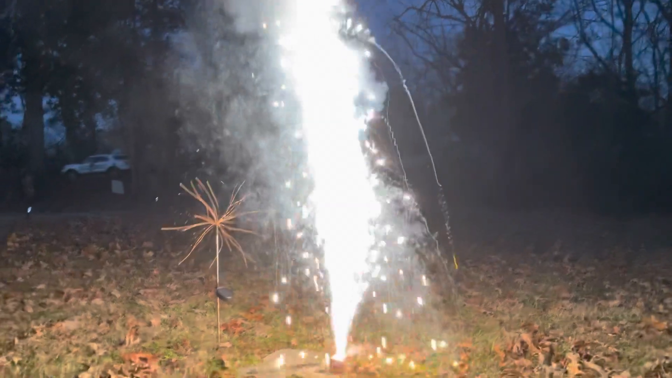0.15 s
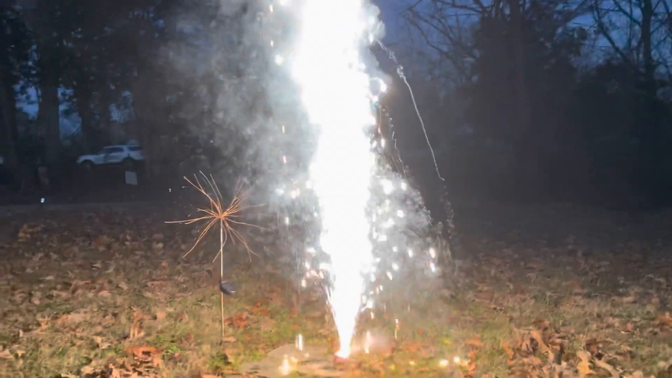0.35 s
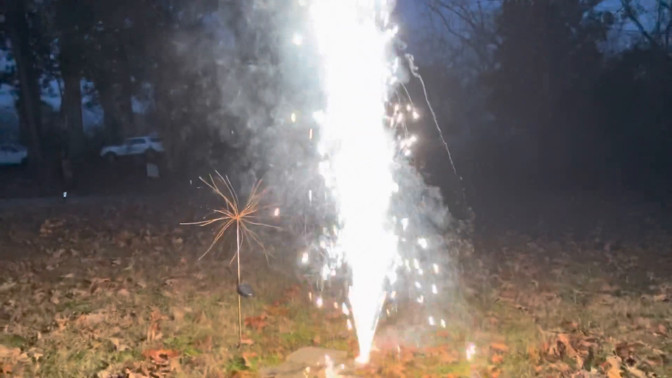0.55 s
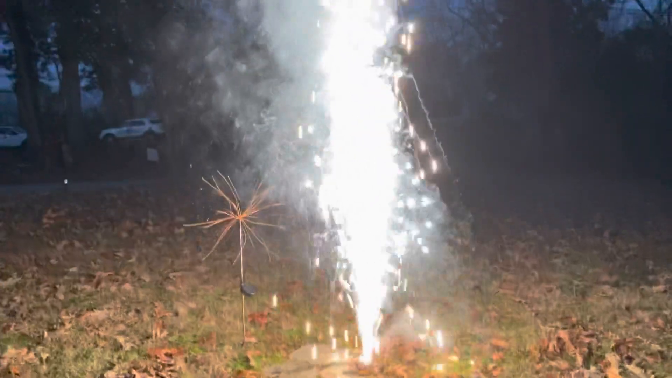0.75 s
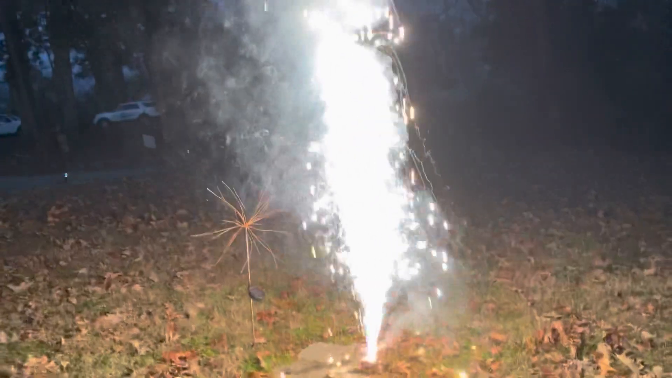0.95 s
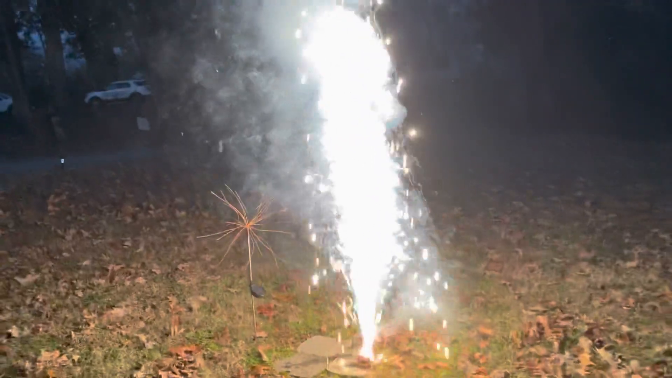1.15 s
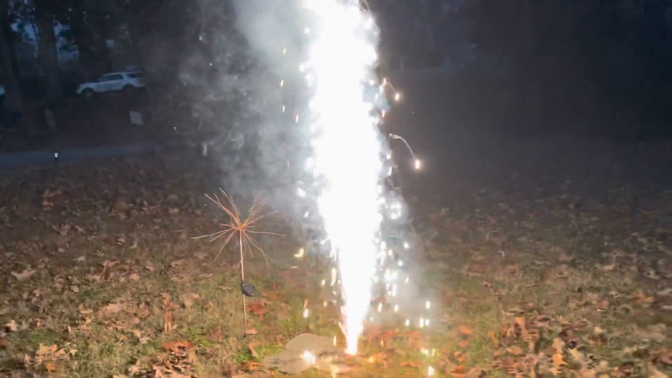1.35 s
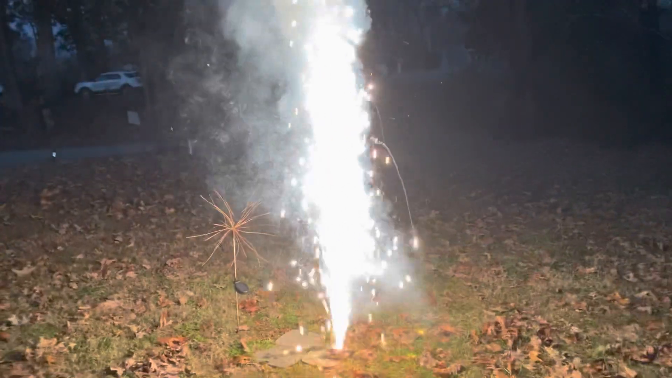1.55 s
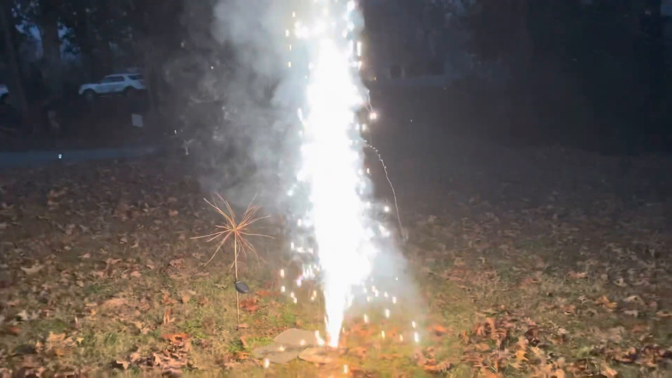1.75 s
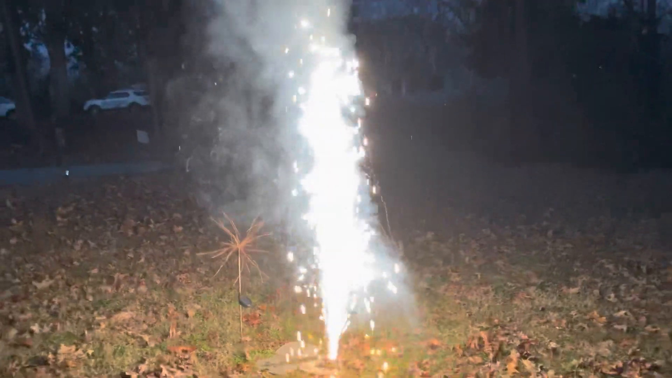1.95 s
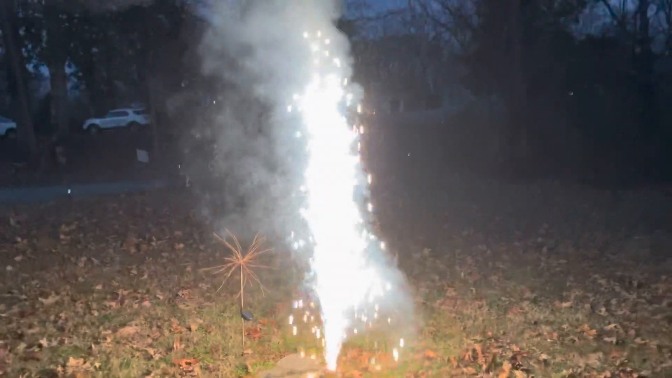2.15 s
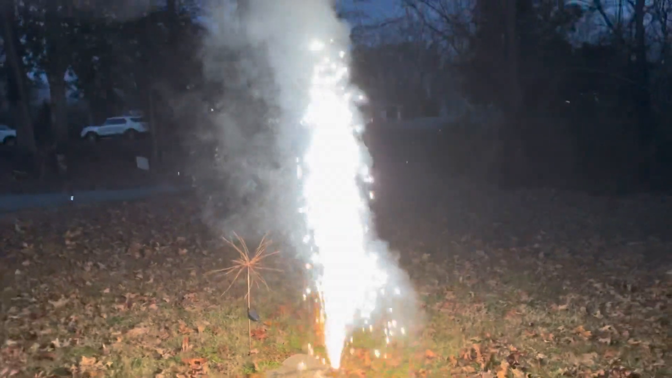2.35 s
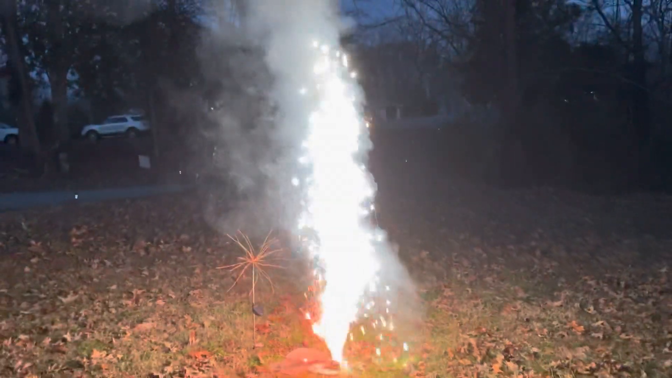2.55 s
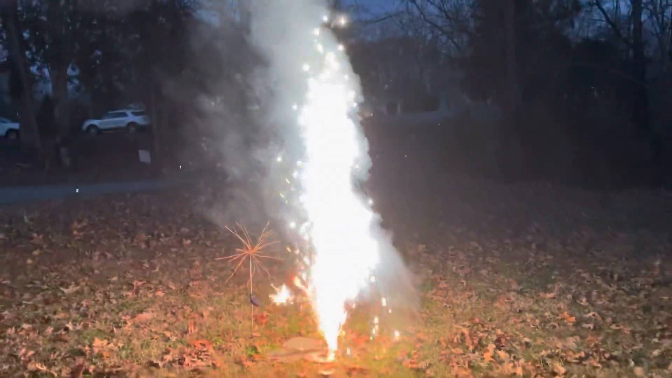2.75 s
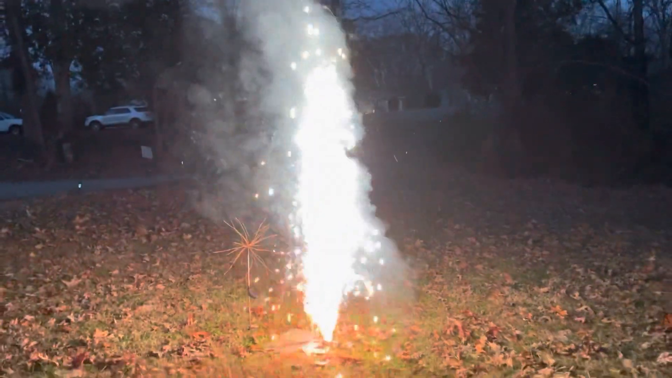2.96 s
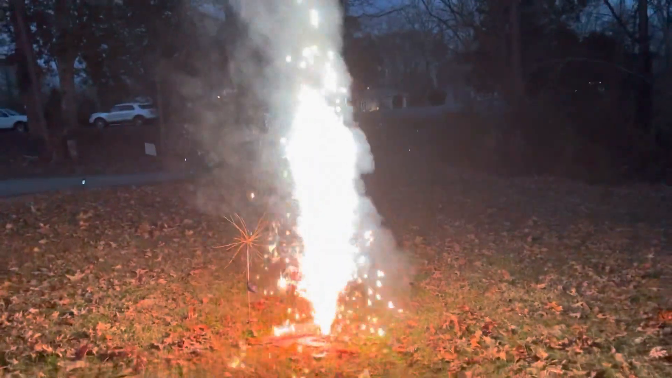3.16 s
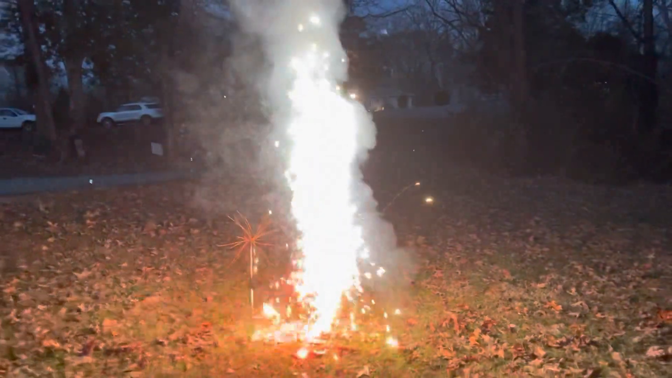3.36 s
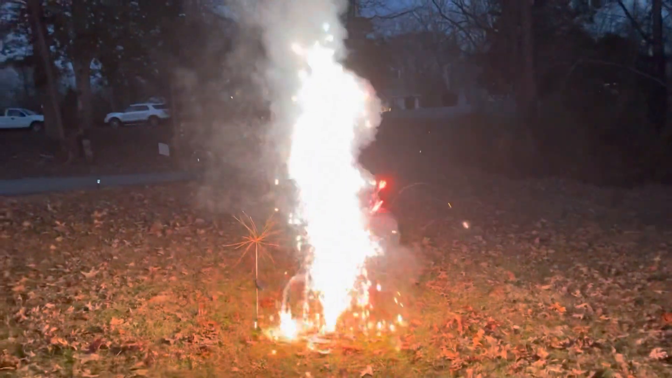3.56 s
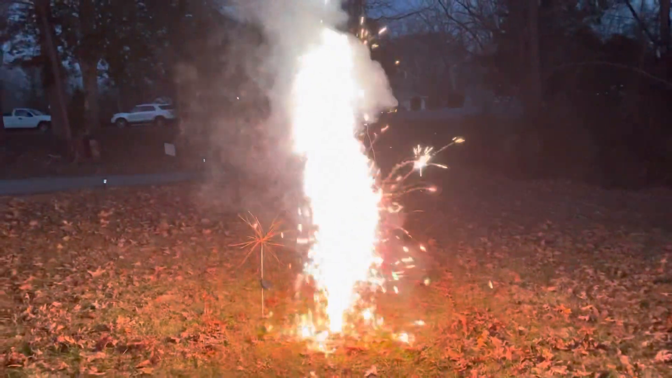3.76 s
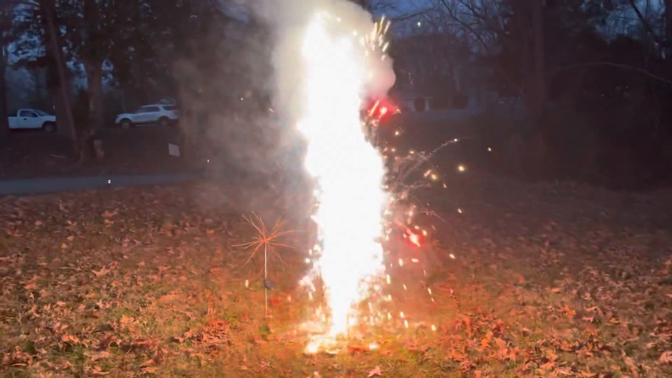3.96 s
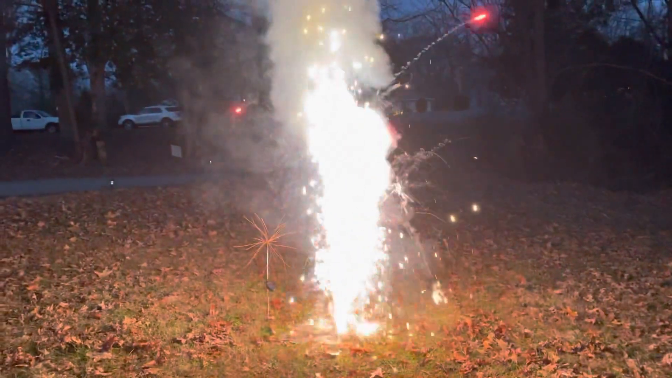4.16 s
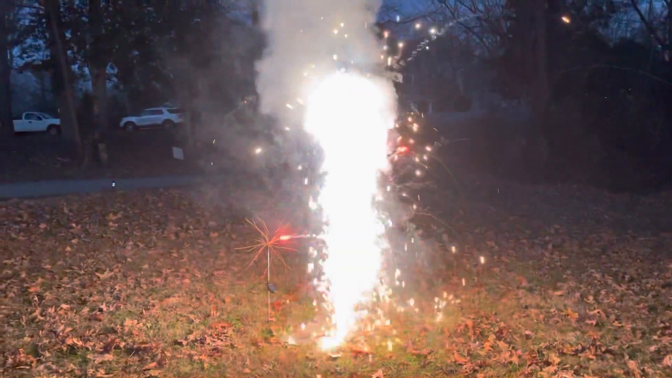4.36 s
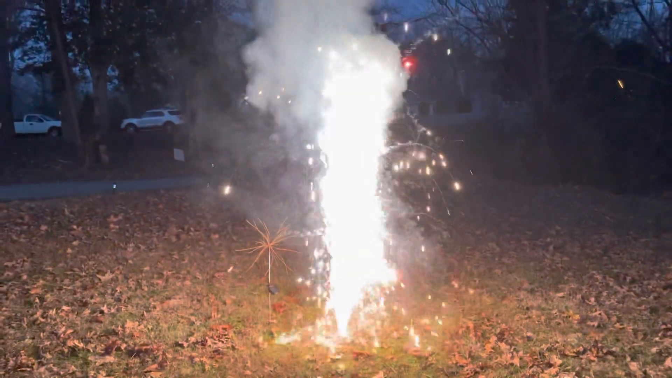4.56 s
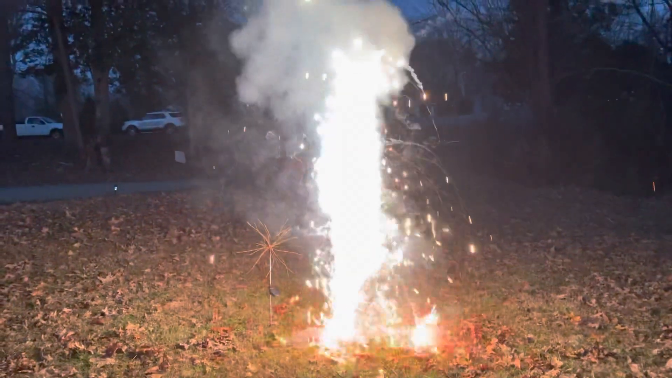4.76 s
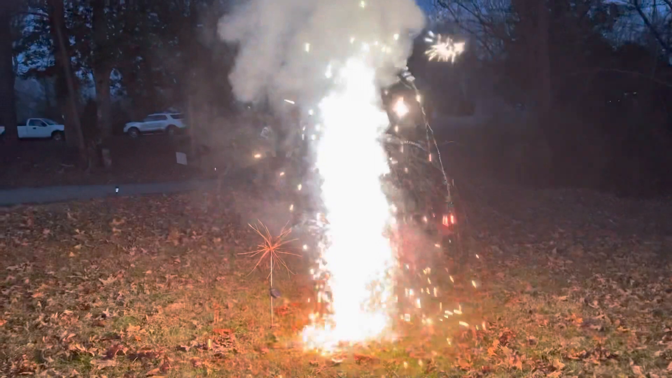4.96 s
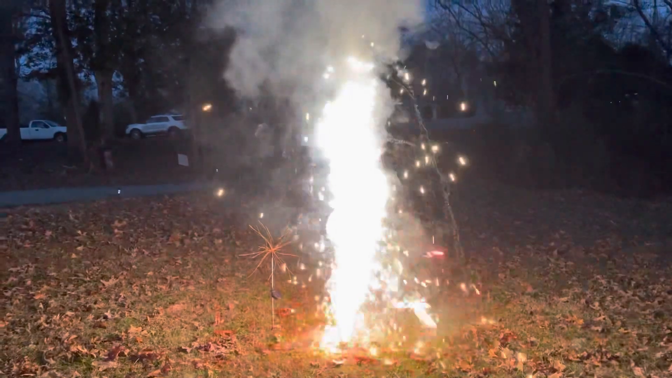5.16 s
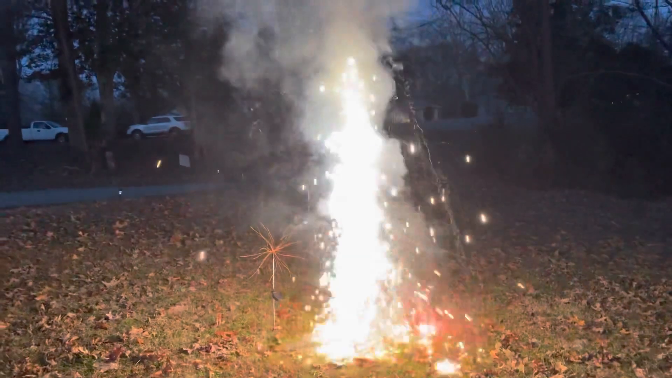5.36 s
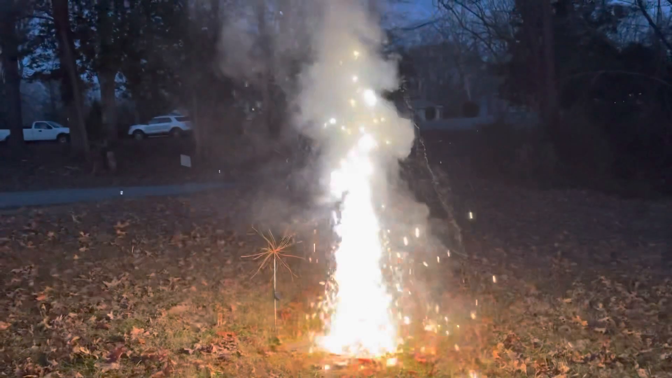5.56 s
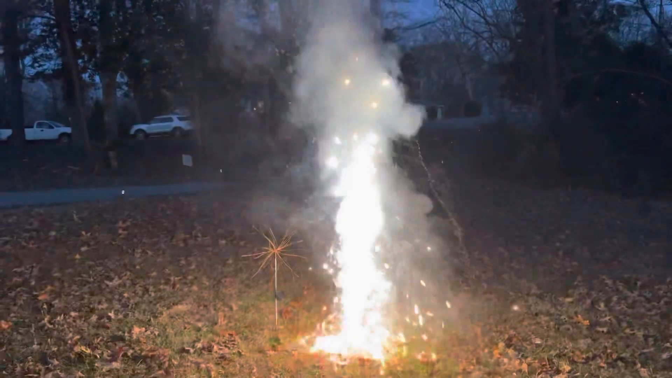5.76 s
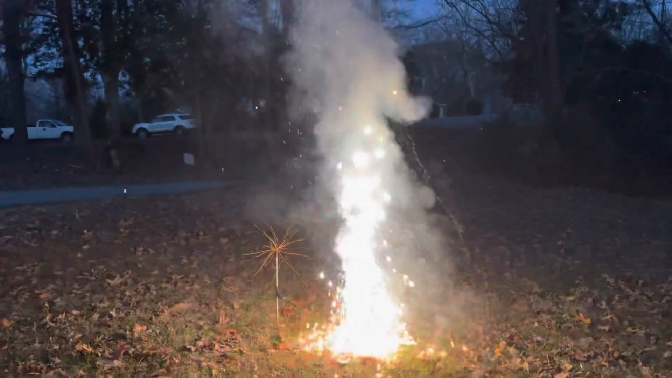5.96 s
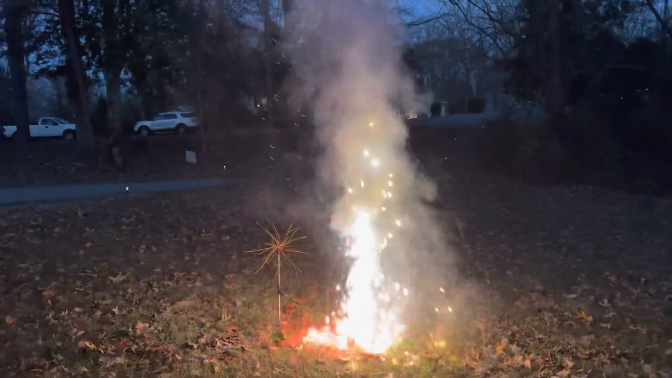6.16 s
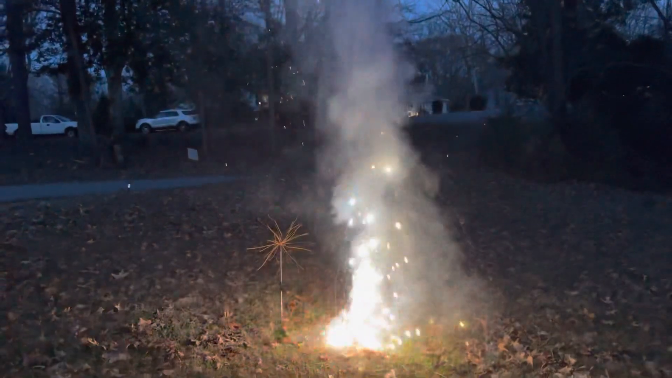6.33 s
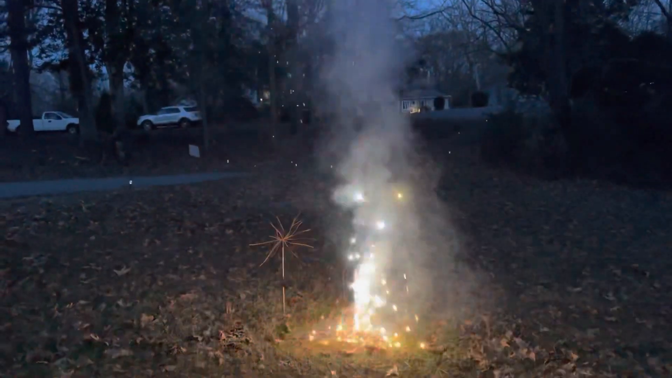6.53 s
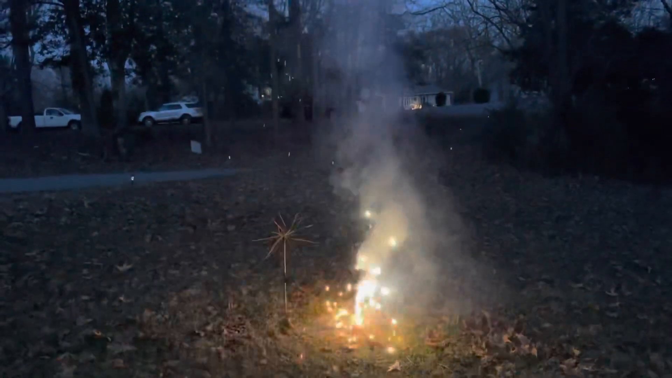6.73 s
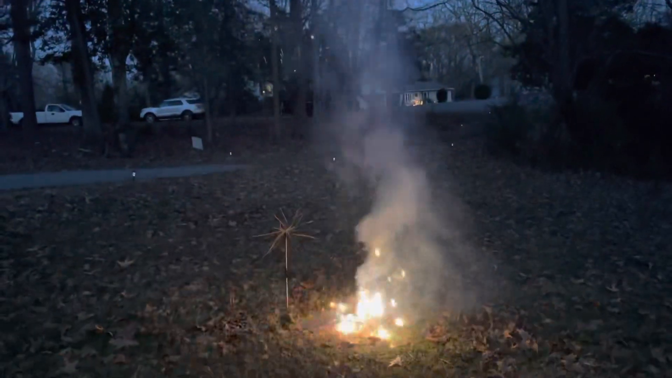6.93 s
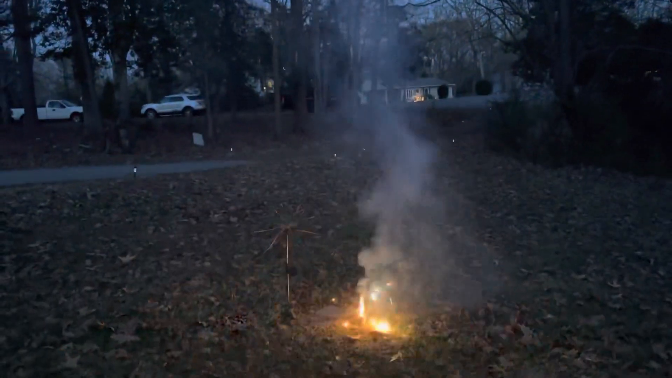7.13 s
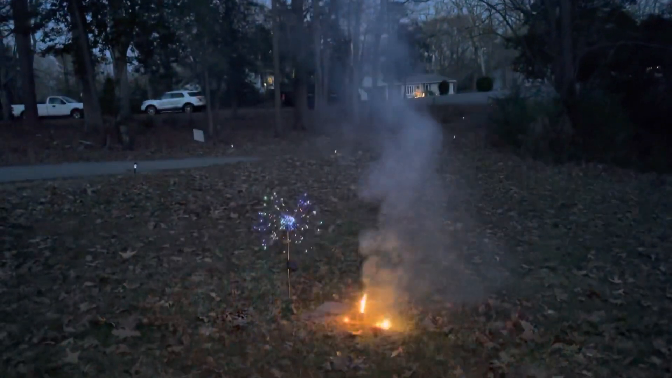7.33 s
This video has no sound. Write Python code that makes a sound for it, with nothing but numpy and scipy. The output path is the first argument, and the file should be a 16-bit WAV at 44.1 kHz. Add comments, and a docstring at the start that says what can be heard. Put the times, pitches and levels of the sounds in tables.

```python
"""A ground fountain firework roars as its gas jet turns turbulent; its nozzle hisses, its grains sizzle.
Each layer is noise given a spectrum and a level in time; the nozzle adds a drifting resonance.
The plume rumbles, sparks snap as filtered spikes, and the last charge goes in separate puffs of noise.
A close reflection cuts moving notches into it all; trees return a faint echo of the puffs and snaps.
It burns on a lawn, and is heard through a hand-held phone."""
import sys
import numpy as np
from scipy import signal
from scipy.fft import rfft, irfft
from scipy.io import wavfile
from scipy.ndimage import map_coordinates

SR = 44100
rng = np.random.default_rng(int(sys.argv[2]) if len(sys.argv) > 2 else 0)


def output_pcm(signal):
    """Save a mono or channel-first signal as 16-bit PCM at the path in sys.argv[1].

    Samples are clipped to [-1, 1] before scaling.
    """
    pcm = np.clip(np.atleast_2d(signal).T, -1, 1) * 32767
    wavfile.write(sys.argv[1], SR, np.round(pcm).astype(np.int16))


N = 330288
TIME = np.arange(N) / SR

# The burn. Each row: time in seconds, roar level in dB, treble level in dB, both before trims and fades.
BURN_LEVELS = [(0.0, -35, -36.5), (0.35, -33.5, -33), (0.49, -35.5, -38), (0.57, -36.5, -33.5),
               (0.65, -34, -33), (1.53, -40.5, -38), (1.59, -40, -35.5), (2.3, -39, -34), (2.42, -40, -35),
               (2.59, -37, -31), (3.14, -39.5, -34), (3.34, -36.5, -31), (4.14, -38, -33),
               (4.69, -37, -31.5), (4.77, -38, -33.5), (4.99, -38.5, -36.5), (5.2, -43.5, -44),
               (5.23, -42.5, -38), (5.31, -42.5, -43.5), (5.4, -39, -40.5)]
# Nozzle resonance, drifting as it burns away. Each row: time in seconds, centre in Hz,
# level in dB over the treble level of the burn.
NOZZLE_RESONANCE = [(0, 5840, 0.5), (.45, 5760, -2), (.85, 5350, 4), (1.2, 5470, -1.5), (1.63, 5600, -1),
                    (1.8, 5500, -9.5), (2.7, 5050, -19), (3.2, 5040, -8), (3.4, 5040, -4.5),
                    (4.7, 5120, -1.5), (6.1, 5420, -11)]
# Flares of the nozzle resonance. Each row: centre in seconds, gain in dB, half length (to 1/e in dB) in seconds.
NOZZLE_FLARES = [(.554, 6.5, .03), (.826, 3.5, .026), (1.342, 5, .036)]
# Spark showers that lift the sizzle. Each row: centre in seconds, gain in dB, half length in seconds.
SPARK_SHOWERS = [(3.38, 4.5, 0.11)]
# The spent charge catching again. Each row: centre in seconds, sizzle gain in dB, half length in seconds.
REIGNITIONS = [(6.06, 9, .15), (6.43, 8, 0.14)]
# Low gusts in the plume. Each row: centre in seconds, gain in dB, half length in seconds.
PLUME_GUSTS = [(.42, 6.5, 0.033), (1.42, 15, 0.018)]
# Puffs of the dying charge. Each row: peak time in seconds, level in dB before the trim,
# time constant of the fall in seconds.
CHARGE_PUFFS = [(5.638, -32, 0.0089), (5.656, -33.5, 0.0041), (5.725, -30.5, 0.0064),
                (5.756, -36.5, 0.0064), (5.783, -32.5, 0.0026), (5.816, -34.5, 0.0088),
                (5.862, -35, 0.0076), (5.913, -34.5, 0.022), (5.961, -38.5, 0.018), (6.124, -41, .0027),
                (6.161, -44, 0.0044), (6.191, -41.5, .007), (6.231, -46, .007), (6.278, -45, .0068),
                (6.328, -41.5, 0.012), (6.367, -41.5, 0.019), (6.398, -42, 0.0061), (6.415, -46.5, .015),
                (6.597, -52, 0.0085), (6.640, -48.5, 0.012), (6.678, -43, 0.0099), (6.798, -48, .003),
                (6.968, -68.5, .016)]
# Bursting sparks. Each row: start in seconds, level in dB before the trim.
SPARK_BURSTS = [(2.8249, -29), (3.012, -24), (3.594, -12), (3.7869, -11), (3.958, -8), (4.189, -13),
                (4.664, -11), (4.8277, -23), (4.9142, -27), (4.9444, -12), (5.107, -20), (5.2367, -13),
                (5.42, -18.5), (5.7604, -28.5), (5.91, -18), (6.326, -33), (6.4671, -43.5), (6.5955, -39),
                (6.7979, -53)]
# Notches of the close reflection. Each row: time in seconds, first notch in Hz, second notch in Hz.
REFLECTION_NOTCHES = [(0, 1750, 4200), (.5, 1680, 4150), (.6, 1150, 3350), (.7, 990, 2900),
                      (.85, 890, 2730), (1.22, 1060, 3250), (1.35, 1330, 3600), (1.47, 1680, 4250),
                      (1.66, 1660, 4250), (1.77, 2120, 7000), (2.2, 2270, 8200), (2.8, 2520, 8400),
                      (6.2, 2800, 8400)]
# Strength of the reflection. Each row: time in seconds, then strength (0 to 1) at the first notch,
# at the second, and above it.
REFLECTION_STRENGTH = [(.45, .45, .86, .15), (.65, .9, .92, .5), (1.3, .82, .82, .4), (1.5, .8, .15, .1),
                       (2.4, .74, .64, .35), (5, .76, .52, .3), (6.2, .48, .3, .2)]

# Spectra. Each row: frequency in Hz, relative spectral level in dB.
ROAR_SPECTRUM = [(40, -19.5), (130, -8.5), (220, -7), (330, 0), (500, 2), (700, 1), (950, 3), (1600, 1.5),
                 (2300, -4.5), (3200, -22.5), (5200, -6), (9000, -41.5)]
HISS_SPECTRUM = [(1500, -17.5), (2800, -2), (3600, 1.5), (4600, 1.5), (5700, -6), (6300, -12.5),
                 (7000, -4.5), (7700, -3), (8400, -8), (10500, -11.5), (16000, -22.5)]
SIZZLE_SPECTRUM = [(3000, -24), (6500, -22.5), (8500, -12), (9600, -7), (11500, -8.5), (12700, -5.5),
                   (13800, 1), (15000, -2.5), (15700, -7)]
RUMBLE_SPECTRUM = [(15, -20), (35, -10.5), (60, -2.5), (95, -3), (160, -6), (240, -2), (450, -16.5),
                   (2000, -70.5)]
PUFF_SPECTRUM = [(30, -19), (120, 1), (400, 3), (1100, 0), (2000, -1.5), (3000, -7.5), (5400, -3.5),
                 (6500, -16.5), (8500, -9), (11000, -11), (14000, -0.5), (16000, -6.5)]
SNAP_SPECTRUM = [(200, -15.5), (2000, -15), (5000, 1.5), (7500, -10), (10000, -2.5), (13500, 4),
                 (16000, -1)]

# level trims of the layers, dB
ROAR_DB, HISS_DB, SIZZLE_DB, RUMBLE_DB, PUFF_DB, SNAP_DB = 3, -1, -1, -18, -2, -0.5
# the charge is spent, and each layer fades at its own rate
SPENT_S = 5.31
ROAR_FADE_DB_PER_S, HISS_FADE_DB_PER_S, SIZZLE_FADE_DB_PER_S, RUMBLE_FADE_DB_PER_S = 32.5, 29, 21.5, 21.5
# later the jet and plume are faded out steeply as well
FADE_OUT_S, FADE_OUT_DB_PER_S = 7.02, 170
# shares of the reignition gain, in dB, that reach the roar (and rumble) and the hiss
REVIVAL_ROAR_SHARE, REVIVAL_HISS_SHARE = 0.39, 0.47
# the flame flutters, more so as it starves; each layer scales this depth
FLUTTER_DB, FLUTTER_DB_PER_S = 0.94, 0.5
CRACKLE_DB = -15  # grain clicks relative to the sizzle's noise
# from this time the nozzle burns wider and the rumble gains on the roar
WIDENS_S, RUMBLE_DB_PER_S = 2.97, 4.5
PUFF_RISE_SHARE = 0.17  # rise time as a share of the fall
REPEAT_SHARE = 0.22  # part of the close echo that bounces again
TREES_DB, TREES_T60_S = -11, 0.36
TOP_HZ = 15720


def jet():
    """Turbulent jet noise and a nozzle resonance, modulated together by uneven combustion."""
    roar_db, hiss_db, sizzle_db, _ = burn()
    centre_hz, over_treble_db = curves(NOZZLE_RESONANCE)
    flutter_db = FLUTTER_DB + FLUTTER_DB_PER_S * since(SPENT_S)
    pressure_db = flutter_db * (0.96 * walk(55) + 0.43 * walk(260))
    flare_db = swells(NOZZLE_FLARES)

    roar_db = ROAR_DB + roar_db + pressure_db + 0.6 * flutter_db * walk(110)
    roar = colour(noise(), ROAR_SPECTRUM) * undb(roar_db)

    ring_db = hiss_db + over_treble_db + pressure_db + flare_db + 0.31 * walk(60)
    ring = unit(moving_filter(noise(), nozzle, [centre_hz])) * undb(ring_db)

    hiss_db = HISS_DB + hiss_db + pressure_db + 0.3 * flare_db
    hiss = colour(noise(), HISS_SPECTRUM) * undb(hiss_db)

    sparks = noise() + undb(CRACKLE_DB) * grains(rate=1300, spread_db=9.0)
    sizzle_db = SIZZLE_DB + sizzle_db + swells(SPARK_SHOWERS) + 1.5 * pressure_db
    sizzle = colour(sparks, SIZZLE_SPECTRUM) * undb(sizzle_db)
    return roar + hiss + ring + sizzle


def burn():
    """Burning rate sets source strength: dB levels of roar, hiss, sizzle and rumble, with the fade-out."""
    roar_db, treble_db = curves(BURN_LEVELS) - FADE_OUT_DB_PER_S * since(FADE_OUT_S)
    spent_s = since(SPENT_S)
    revival_db = swells(REIGNITIONS)
    return (roar_db - ROAR_FADE_DB_PER_S * spent_s + REVIVAL_ROAR_SHARE * revival_db,
            treble_db - HISS_FADE_DB_PER_S * spent_s + REVIVAL_HISS_SHARE * revival_db,
            treble_db - SIZZLE_FADE_DB_PER_S * spent_s + revival_db,
            roar_db - RUMBLE_FADE_DB_PER_S * spent_s + REVIVAL_ROAR_SHARE * revival_db)


def nozzle(hz, centre, half_width_hz=400):
    """Resonance: gain of a broad, steep-sided peak at the nozzle's centre frequency."""
    return 1 / np.sqrt(1 + ((hz - centre) / half_width_hz) ** 4)


def grains(rate, spread_db):
    """Impulsive noise: randomly timed clicks, rate a second, most small and a few large, at rms 1."""
    size = undb(spread_db * np.minimum(rng.exponential(size=N), 4))
    present = rng.random(N) < rate / SR
    return unit(present * size * np.sign(noise()))


def puffs():
    """Transient gas release: lumps of charge flare up and die away as short, gritty bursts of noise."""
    gas = colour(noise() + 0.55 * grains(rate=1500, spread_db=4.5), PUFF_SPECTRUM)
    envelope = np.zeros(N)
    for s, db, fall in CHARGE_PUFFS:
        age = (TIME - s) / fall
        # bell-shaped rise, exponential fall
        envelope += undb(db) * np.exp(-np.where(age < 0, (age / PUFF_RISE_SHARE) ** 2, age))
    return undb(PUFF_DB) * envelope * gas


def snaps(fizz_db=-15, fizz_s=0.0034, size=1024):
    """Impulsive radiation: a bursting spark gives one spike, and its fragments a decaying fizz."""
    out = np.zeros(N)
    for s, db in SPARK_BURSTS:
        burst = undb(fizz_db) * rng.standard_normal(size) * np.exp(-TIME[:size] / fizz_s)
        burst[0] = 1
        start = int(s * SR)
        out[start:start + size] += undb(SNAP_DB + db) * burst
    crack = response(SNAP_SPECTRUM)
    return signal.oaconvolve(out, crack / np.abs(crack).max())[:N]


def plume():
    """Large-eddy turbulence: hot gas rumbles under the jet, gaining as the nozzle widens until it is spent."""
    widened_s = since(WIDENS_S) - since(SPENT_S)
    level_db = burn()[-1] + RUMBLE_DB_PER_S * widened_s + swells(PLUME_GUSTS)
    return colour(noise(), RUMBLE_SPECTRUM) * undb(RUMBLE_DB + level_db)


def bounce(hz, first, second, low, high, top):
    """Interference: a close echo cancels the direct sound at lags of half a cycle and one and a half."""
    between = (hz - first) / (second - first)
    lag_cycles = np.where(hz < first, 0.5 * hz / first, 0.5 + between)
    # strength depends on frequency, since a rough surface scatters the treble
    to_second = (high - low) * np.clip(between, 0, 1)
    above_second = (top - high) * np.clip(between - 1, 0, 1)
    echo = (low + to_second + above_second) * np.exp(-2j * np.pi * lag_cycles)
    # a share of the echo bounces again and again, which narrows the notches
    return (1 + echo) / (1 + REPEAT_SHARE * echo)


def trees(x, build_s=0.012, size=32768):
    """Diffuse scattering: trunks and branches return a short echo that builds up, then decays."""
    age = TIME[:size]
    decay = np.exp(-np.log(1000) * age / TREES_T60_S)
    tail = rng.standard_normal(size) * (1 - np.exp(-age / build_s)) * decay
    return undb(TREES_DB) * signal.oaconvolve(x, tail / np.linalg.norm(tail))[:N]


def moving_filter(x, gain, controls, size=1024):
    """Time-varying filtering: each short-time spectrum of x is multiplied by gain(Hz, controls)."""
    hz, s, spectra = signal.stft(x, SR, nperseg=size)
    now = [np.interp(s, TIME, c) for c in controls]
    return signal.istft(spectra * gain(hz[:, None], *now), SR, nperseg=size)[1][:N]


def response(points, size=4096):
    """Minimum phase: causal impulse response of a (Hz, dB) spectrum, folded from its cepstrum."""
    hz, db = np.transpose(points)
    bins = np.maximum(np.fft.rfftfreq(size, 1 / SR), 1)
    bins_db = np.interp(np.log(bins), np.log(hz), db)
    cepstrum = irfft(np.log(undb(bins_db)))
    cepstrum[1:size // 2] *= 2
    cepstrum[size // 2 + 1:] = 0
    return irfft(np.exp(rfft(cepstrum)), size)


def colour(x, points):
    """Linear filtering: give x a spectrum, at rms 1."""
    return unit(signal.oaconvolve(x, response(points))[:N])


def noise():
    """White noise: equal mean power at every frequency."""
    return rng.standard_normal(N)


def walk(rate):
    """Slow random modulation: smoothed random points, rate a second, at rms 1."""
    return unit(map_coordinates(rng.standard_normal(8192), [TIME * rate], order=2, mode='wrap'))


def swells(table):
    """Level modulation: brief bell-shaped changes of level, in dB."""
    return sum(db * np.exp(-((TIME - s) / length) ** 2) for s, db, length in table)


def since(s):
    """Elapsed time: seconds gone by after a moment, zero before it."""
    return np.maximum(TIME - s, 0)


def curves(table):
    """Linear interpolation: each column of a table as a line through time."""
    s, *columns = np.transpose(table)
    return [np.interp(TIME, s, c) for c in columns]


def undb(db):
    """Decibel law: level to amplitude gain."""
    return 10 ** (np.asarray(db) / 20)


def unit(x):
    """Mean-power normalisation: scale to rms 1."""
    return x / np.sqrt(np.mean(x ** 2))


def scene():
    """Superposition: all sources and the trees' echo pass the close reflection, alike in both channels."""
    bursts = puffs() + snaps()
    total = jet() + plume() + bursts + trees(bursts)
    sound = moving_filter(total, bounce, curves(REFLECTION_NOTCHES) + curves(REFLECTION_STRENGTH))
    return np.array([sound, sound])


def record(dry):
    """Band limiting: the phone cuts the top steeply."""
    lowpass = signal.ellip(12, 0.2, 80, TOP_HZ, fs=SR, output="sos")
    return signal.sosfilt(lowpass, dry)


dry = scene()
out = record(dry)
output_pcm(out)
```